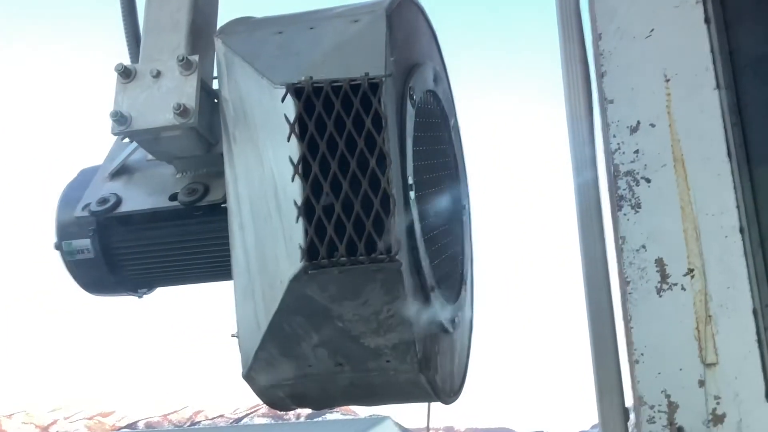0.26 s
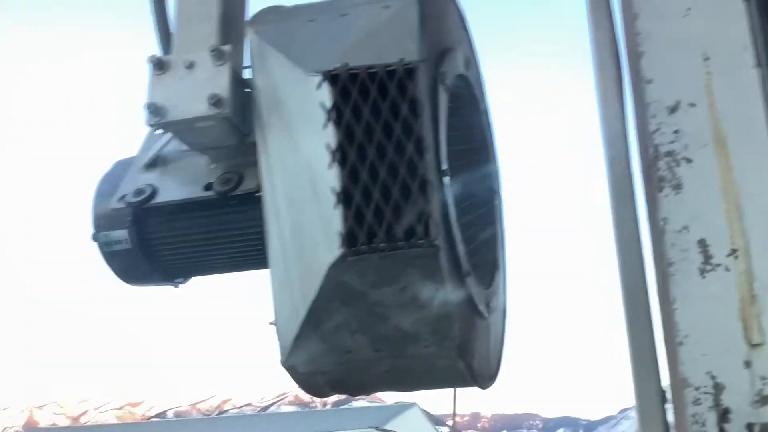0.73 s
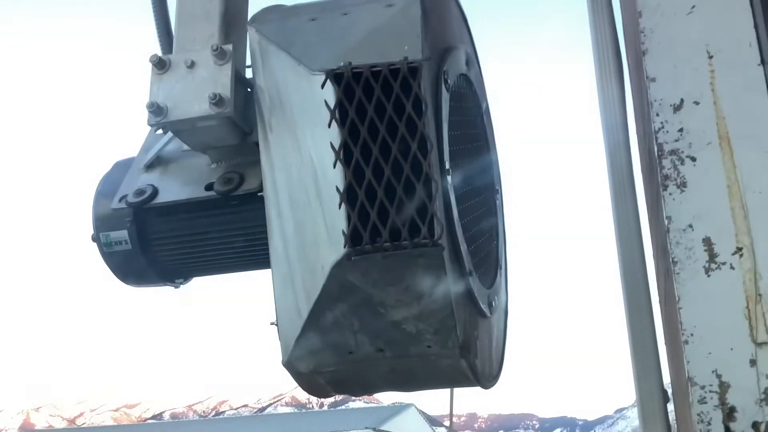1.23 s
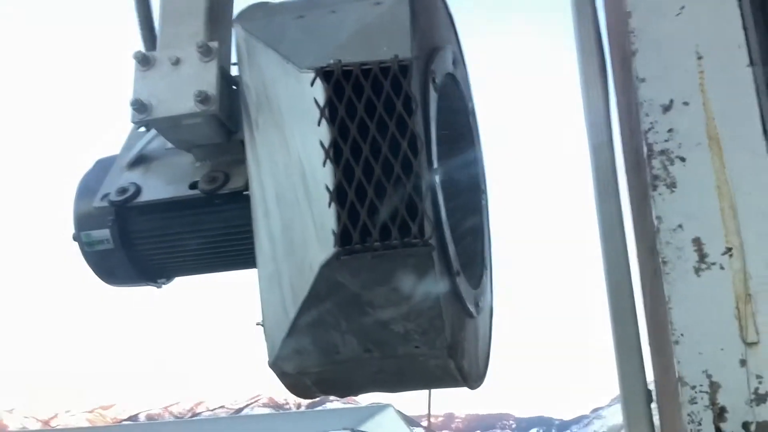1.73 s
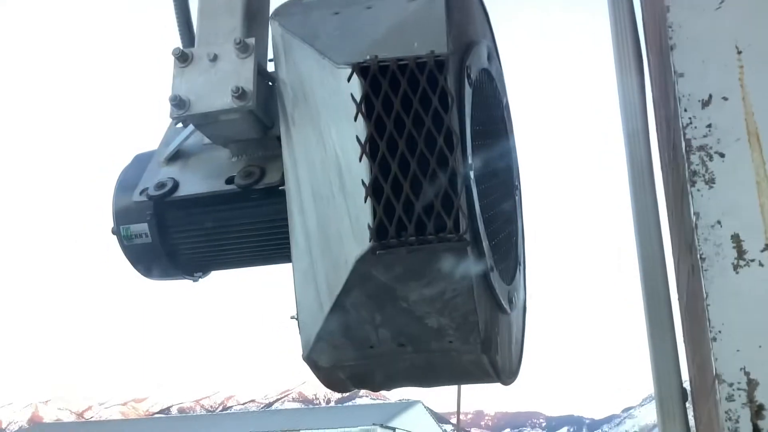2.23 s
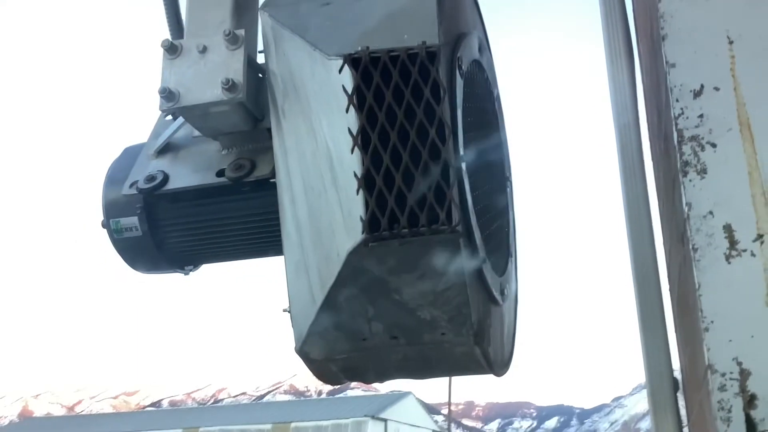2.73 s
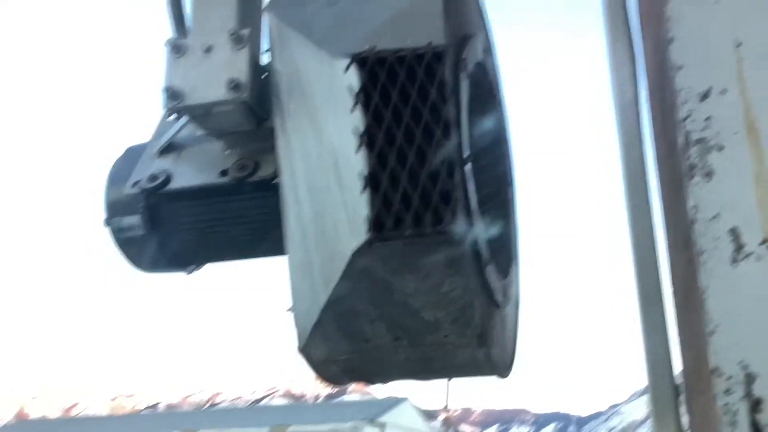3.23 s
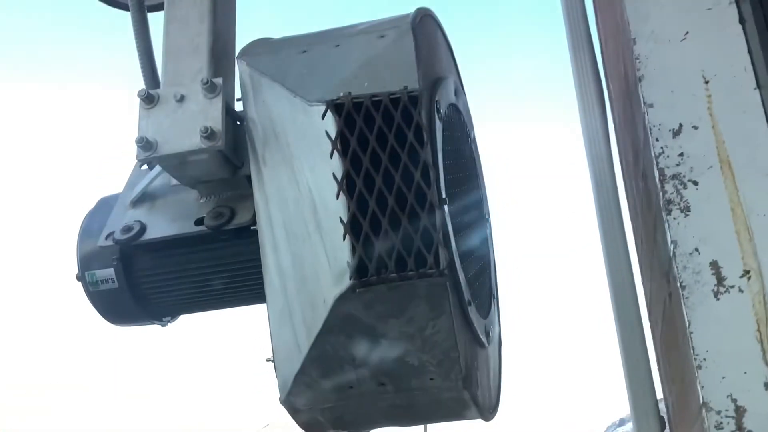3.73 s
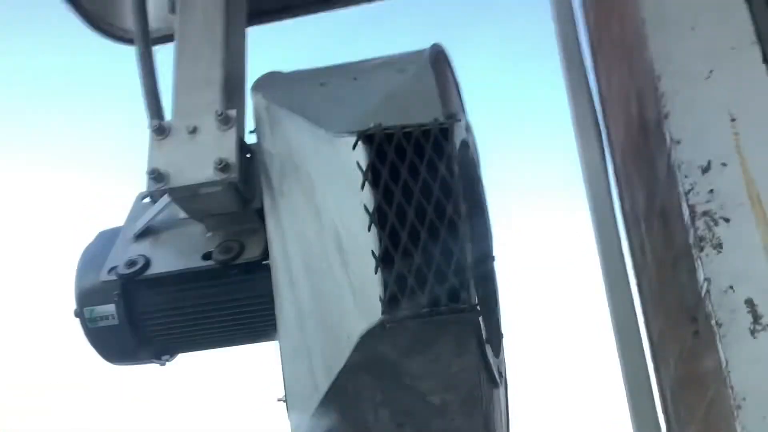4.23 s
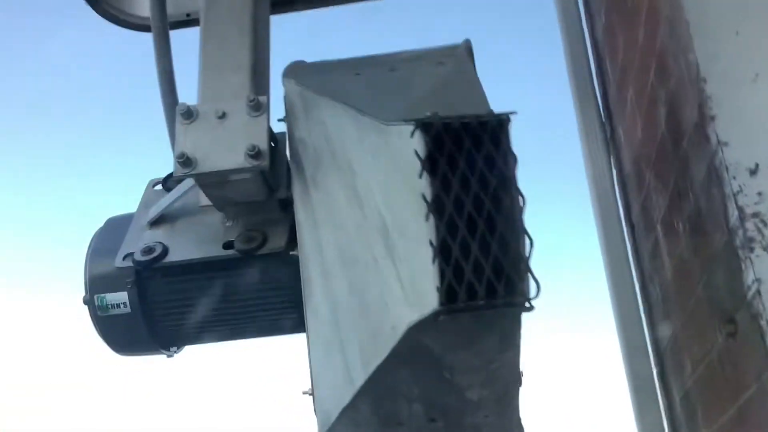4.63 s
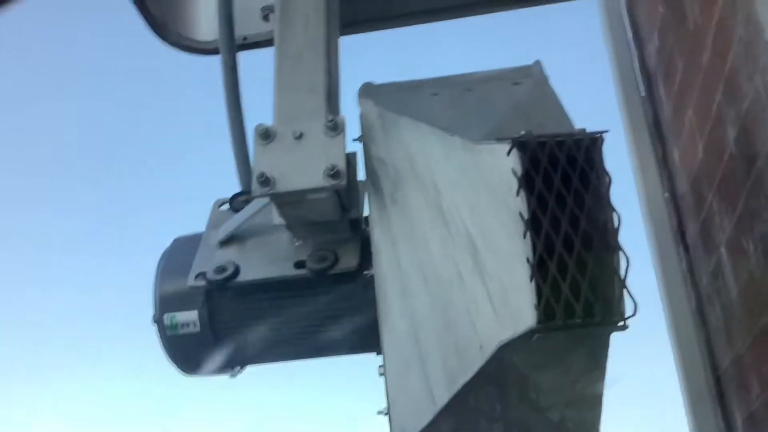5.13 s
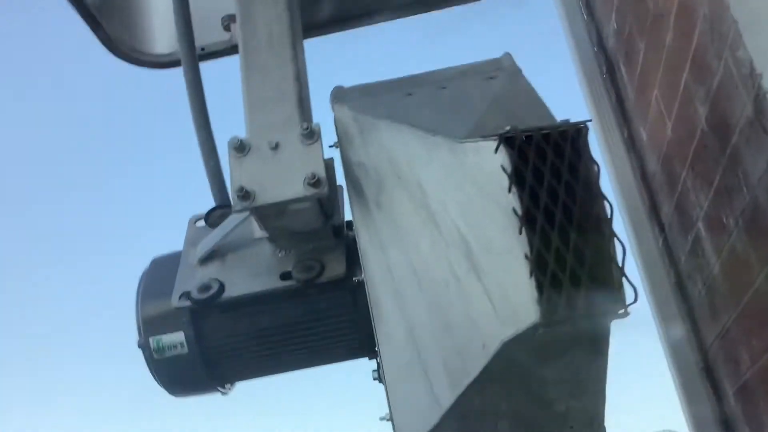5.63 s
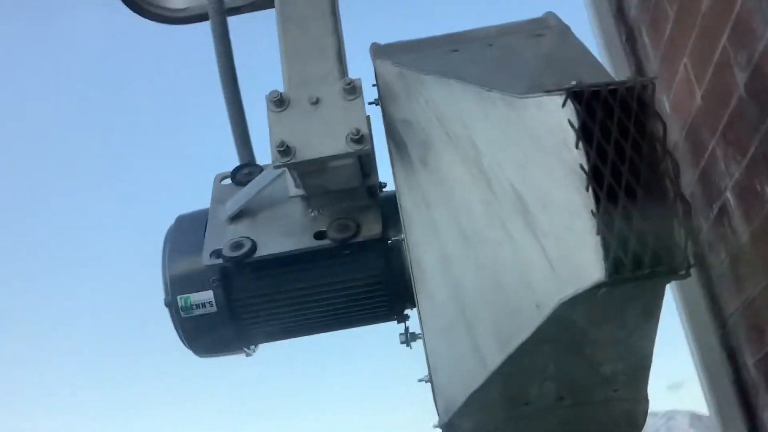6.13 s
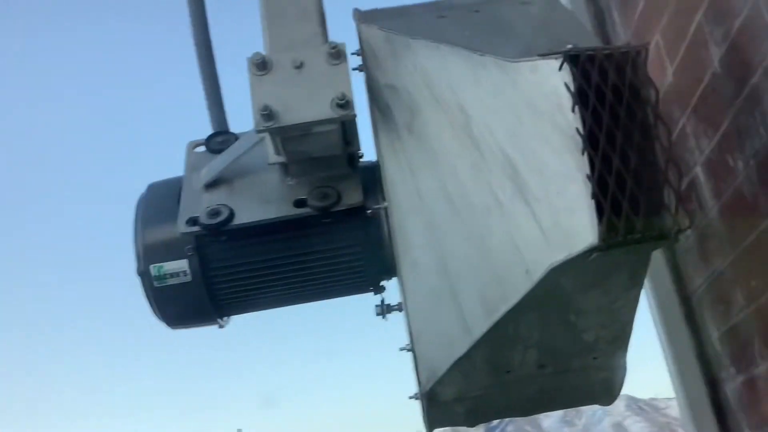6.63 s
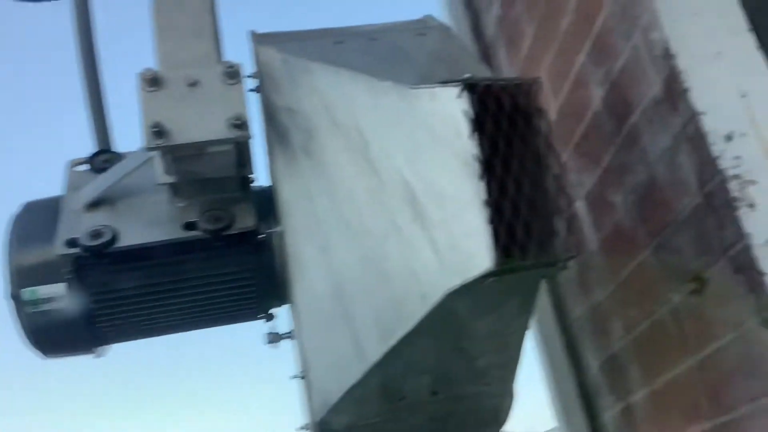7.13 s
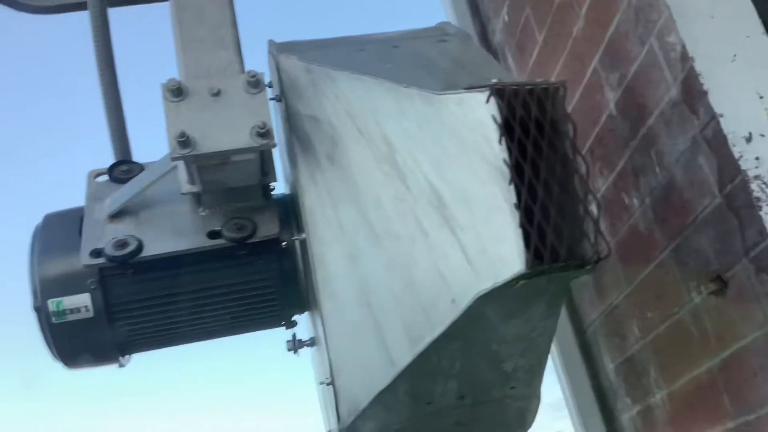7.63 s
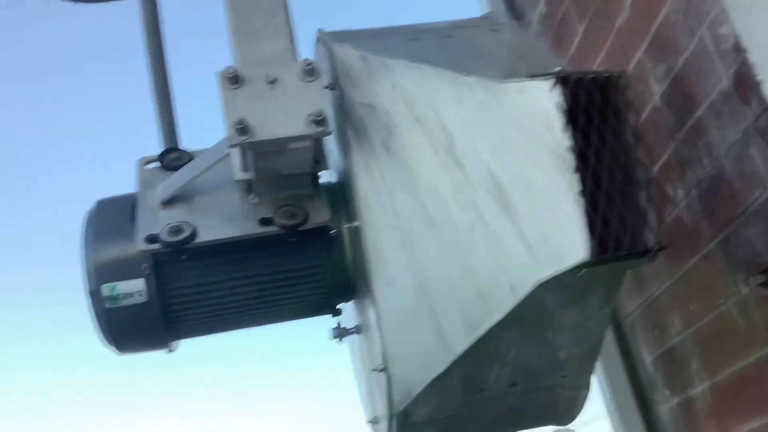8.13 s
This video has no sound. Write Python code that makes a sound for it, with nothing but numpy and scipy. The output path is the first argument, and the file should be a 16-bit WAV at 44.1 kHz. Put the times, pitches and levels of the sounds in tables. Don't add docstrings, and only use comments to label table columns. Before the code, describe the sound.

Heard through closed car glass, a heavy low air roar pulses repeatedly and grows stronger, over steady rumble, faint fan hum and thin seal hiss.

```python
import sys
import numpy as np
from scipy import signal
from scipy.fft import rfft, irfft, next_fast_len
from scipy.io import wavfile
from scipy.ndimage import uniform_filter1d, minimum_filter1d

SR = 44100
rng = np.random.default_rng(int(sys.argv[2]) if len(sys.argv) > 2 else 0)


def wav_out(sig):
    wavfile.write(sys.argv[1], SR, np.round(np.clip(np.atleast_2d(sig).T, -1, 1) * 32767).astype(np.int16))


def natural_amplitude(level_db):
    exponent = np.asarray(level_db, float) / 20
    return 10 ** exponent


N = 369116


# [f/Hz, level/dB per Hz]
BOOM_ASIDE = [(62, -44), (105, 1), (129, -8), (162, 1.5), (183, -8), (307, -19.5), (330, -8), (430, -50),
              (730, -120)]
BOOM_SQUARE = [(62, -30), (105, -6), (124, -3.5), (145, 2), (178, -4), (231, -3.5), (279, -14), (330, -14),
               (430, -44), (730, -120)]
BOOM_ASIDE_DB = (-17, -19.5, -22, -22.5)


def jet_boom():
    boom_db = by_turn(BOOM_ASIDE_DB) + jet_swell("boom")
    square = (boom_db + 20) / 7
    boom = airflow([BOOM_ASIDE, BOOM_SQUARE], square, 0.56, 0.64, size=4096, count=80)
    flutter_db = 0.69 * wander(6.3)
    return natural_amplitude(boom_db - 0.15 + flutter_db) * boom


# [f/Hz, level/dB per Hz]
PANELS_FACING = [(150, -16), (260, -0.5), (296, -7.5), (339, -2.5), (459, -7), (504, -6.5), (599, -15.5),
                 (639, -16.5), (950, -27.5), (1240, -60), (2090, -120)]
PANELS_TURNED = [(150, -11.5), (260, 2.5), (281, -6), (311, -9.5), (366, -0.5), (523, 0), (636, -7),
                 (852, -14), (950, -19.5), (1240, -41), (2090, -120)]
ROAR_ASIDE_DB = (-25, -27, -28.5, -27)
# [f/Hz, width/Hz, level/dB, follow/dB per dB of panel roar]
PANE = (3798, 500, -64, 3.5)


def panels():
    turned = blower_turn()
    roar_db = by_turn(ROAR_ASIDE_DB) + jet_swell("roar")
    roar = airflow([PANELS_FACING, PANELS_TURNED], turned, 0.54, 0.54, size=2048, count=110)
    hz, width, db, follow = PANE
    pane_db = db + follow * (roar_db - roar_db.mean()) - 40 * turned
    return natural_amplitude(roar_db + 1.42) * roar + natural_amplitude(pane_db) * ring(hz, width)


# [f/Hz, level/dB per Hz]
RUSH_FACING = [(460, -3), (780, -1), (823, -5), (1050, 4.5), (1230, -7.5), (1430, 1.5), (1590, -9),
               (1920, -6), (2450, -12), (2580, -10.5), (3730, -14), (4110, -15.5), (6600, -23.5),
               (8580, -39), (14500, -120)]
RUSH_TURNING = [(460, -21), (780, 2.5), (993, -7), (1210, -3), (1580, -17.5), (1640, -11), (1890, -9),
                (2140, -14), (2320, -11), (2510, -16), (2980, -16), (3260, -15), (6600, -26), (8580, -56),
                (14500, -120)]
RUSH_SIDEWAYS = [(460, -20), (780, -3.5), (933, -9), (1210, -7), (1440, -15.5), (1810, -20), (2010, -23),
                 (2930, -19), (3200, -23), (4040, -25), (5230, -30.5), (5720, -28), (6600, -49),
                 (8580, -68), (14500, -120)]
RUSH_TURNED = [(460, -19), (780, -4.5), (845, -1), (916, -8), (1390, -11.5), (2050, -26.5), (2240, -27.5),
               (2470, -22.5), (2650, -28), (2900, -24.5), (3230, -30.5), (3350, -29), (3690, -28),
               (4660, -31), (6600, -35), (8580, -65), (14500, -120)]


def air_rush():
    colours = [RUSH_FACING, RUSH_TURNING, RUSH_SIDEWAYS, RUSH_TURNED]
    air = airflow(colours, blower_turn(), 0.95, 1.33, size=1024, count=260)
    level_db = by_turn((-39.5, -40.5, -39.5, -36))
    level_db = level_db + 0.1 * jet_swell("roar") + jet_brush()
    return natural_amplitude(level_db + 2.2 + 0.49 * wander(27)) * air


# [start t/s, end t/s, f/Hz, width/Hz, level/dB]
MOANS = [
    (4.196, 5.2, 3010, 200, -53.5),
    (6.85, 8.9, 5330, 500, -60.5),
    (6.9, 8.7, 4740, 160, -59),
]


def trim_moans():
    t = np.arange(N) / SR
    moans = np.zeros(N)
    for start, end, hz, width, db in MOANS:
        progress = np.clip((t - start) / (end - start), 0, 1)
        envelope = np.sqrt(abs(np.sin(np.pi * progress)))
        moans += natural_amplitude(db) * envelope * ring(hz, width)
    return moans


# [f/Hz, level/dB per Hz]
HISS_FACING = [(3410, -17), (5800, -32), (6380, -18.5), (8470, -10), (9380, -9), (9700, -4), (10100, -4.5),
               (10700, -7), (11800, -10), (15500, -28)]
HISS_SIDEWAYS = [(3410, -16), (5800, -17), (6450, -12), (7610, -6), (8230, -10), (8890, -4), (9230, -4.5),
                 (10600, -4.5), (12600, -15), (13200, -19), (15500, -20)]
HISS_TURNED = [(3410, -28), (5800, -3), (6350, -13), (7040, -1), (9270, 0.5), (10300, 0.5), (10500, -5),
               (11100, -2), (11700, -7), (14100, -12), (15500, -19)]
HISS_DB = (-49.5, -52, -51.5, -52)


def seal_hiss(gusts):
    colours = [HISS_FACING, HISS_SIDEWAYS, HISS_TURNED]
    air = airflow(colours, blower_turn(), 0.93, 0.91, size=1024, count=400)
    level_db = by_turn(HISS_DB) + 0.67 * jet_brush()
    return natural_amplitude(level_db + 5.0 + 0.5 * gusts) * air


# [f/Hz, width/Hz, level/dB]
GAP = [(9860, 140, -4), (9990, 230, 0), (9430, 380, -8)]
# [t/s, level/dB, f/Hz]
WIDENING = [
    (0, -5, 9760),
    (3.7, 0, 10170),
    (4.3, -2, 10470),
    (4.6, 4, 10500),
    (5.2, 4.5, 10500),
]
# [f/Hz, width/Hz, level/dB]
LOWER_GAP = (8890, 110, -59.5)
# [t/s, length/s, swell level/dB]
GUSTS = [(0.349, 0.042, 14), (0.478, .05, 7.5), (0.607, .07, 7), (1.353, .05, 6), (1.68, 0.18, 9),
         (1.976, 0.055, 2), (2.643, 0.04, 9), (2.723, 0.046, 8), (3.74, .07, 7), (3.84, .06, 7),
         (4.35, .06, 1.5), (4.753, .05, 6)]


def seal_whistle(gusts):
    t = np.arange(N) / SR
    upper_db, upper_hz = curves(WIDENING)
    notes = list(GAP) + [(upper_hz, 420, upper_db)]
    whistle = sum(natural_amplitude(db) * ring(hz, width) for hz, width, db in notes)
    creep_db = 1.0 * t
    fading_db = -22 * np.clip((t - 4.4) / 1.1, 0, 1)
    level_db = -55.5 + creep_db + fading_db + bumps(*np.transpose(GUSTS)) + 2.5 * gusts
    hz, width, db = LOWER_GAP
    lower = natural_amplitude(db - 60 * blower_turn()) * ring(hz, width)
    return natural_amplitude(level_db) * whistle + lower


BLADE_HZ = 586.8
# [multiple, level/dB]
BLADE_ORDERS = [(1, 0), (2, -15), (3, -22), (4, -29), (5, -28)]


def blades():
    facing_db = jet_swell("blades", lead_s=0.51)
    turns = np.cumsum(BLADE_HZ + 1.8 * wander(5)) / SR
    hum = np.zeros(N)
    for k, db in BLADE_ORDERS:
        level_db = db + 3.2 * wander(5) + (facing_db - 6) / k
        hum += natural_amplitude(level_db) * np.cos(2 * np.pi * k * turns)
    return natural_amplitude(-39.5) * np.sqrt(2) * hum


# [f/Hz, level/dB per Hz]
CABIN = [(24, -47), (40, -11), (73, 0), (115, 0.5), (150, -22.5), (250, -120)]


def cabin_rumble():
    return natural_amplitude(-19.95) * airflow([CABIN, CABIN], blower_turn(), 0.23, 0.34, size=4096, count=40)


# [t/s, boom swell level/dB, roar swell level/dB, blade swell level/dB]
SWEEPS = [
    (0.68, 3, 4, 3),
    (2.15, 3.5, 4.5, 11.5),
    (3.6, 3.5, 5.5, 10),
    (5.0, 6.5, 4, 4.5),
    (6.45, 9.5, 7, 8),
    (7.88, 10.5, 6, 15),
]


def jet_swell(part, lead_s=0):
    times, boom, roar, blade = np.transpose(SWEEPS)
    swell_db = {"boom": boom, "roar": roar, "blades": blade}[part]
    return bumps(times - lead_s, 1.485, swell_db)


# [t/s, length/s, swell level/dB]
BRUSH = (4.2, 1.0, 1)


def jet_brush():
    return bumps(*np.transpose([BRUSH]))


# [t/s, turn 0-1]
TURN = [
    (0, 0.04),
    (3.9, 0.06),
    (4.5, 0.22),
    (5, 0.2),
    (5.5, 0.35),
    (6.3, 0.66),
    (6.7, 0.61),
    (7.1, 0.91),
    (8.37, 1),
]


def blower_turn():
    return curves(TURN)[0]


def by_turn(levels):
    return np.interp(blower_turn(), np.linspace(0, 1, len(levels)), levels)


def airflow(colours, share, patchy_db, ridged_db, size, count):
    hop = size // 4
    frames = N // hop + 5
    hz = np.fft.rfftfreq(size, 1 / SR)[:count]
    a, b, patches, ridges = rng.standard_normal((frames, len(hz), 4)).T
    patches = uniform_filter1d(patches, size=9, axis=0)
    patches = evened(uniform_filter1d(patches, size=15, axis=1))
    for _ in range(2):
        ridges = uniform_filter1d(ridges, size=2, axis=0)
        ridges = uniform_filter1d(ridges, size=SR // hop, axis=1)
    shapes_db = []
    for rows in colours:
        f, db = np.transpose(rows)
        shapes_db.append(np.interp(np.log(hz + 1), np.log(f + 1), db, left=-120))
    frame_share = share[np.minimum(np.arange(frames) * hop, N - 1)]
    place = np.clip(frame_share, 0, 1) * (len(colours) - 1)
    weights = np.maximum(1 - abs(place - np.arange(len(colours))[:, None]), 0)
    colour = natural_amplitude(np.array(shapes_db).T @ weights)
    colour = colour / np.sqrt((colour ** 2).mean(0))
    colour = colour * natural_amplitude(patchy_db * patches + ridged_db * evened(ridges))
    spectra = np.pad((a + 1j * b) * colour, ((0, 2 * hop + 1 - count), (0, 0)))
    return evened(signal.istft(spectra, nperseg=size, noverlap=size - hop)[1][:N])


def ring(hz, width):
    r = np.exp(-np.pi * width / SR)
    slow = signal.lfilter([1], [1, -2 * r, r * r], rng.standard_normal((2, N)))
    angle = 2 * np.pi * np.cumsum(hz * np.ones(N)) / SR
    return evened(slow[0] * np.cos(angle) + slow[1] * np.sin(angle))


def bumps(times, lengths, heights):
    t = np.arange(0, N, 64) / SR
    phase = np.pi * np.clip((t[:, None] - times) / lengths, -0.5, 0.5)
    swells = np.cos(phase) ** 1.52 @ heights
    return np.interp(np.arange(N) / SR, t, swells)


def wander(hz):
    size = next_fast_len(N)
    z = rfft(rng.standard_normal(size))
    f = np.fft.rfftfreq(size, 1 / SR)
    return evened(irfft(z * (f > 0) / (1 + (f / hz) ** 2), size)[:N])


def curves(rows):
    s, *columns = np.transpose(rows)
    return [np.interp(np.arange(N) / SR, s, c) for c in columns]


def evened(x):
    return x / np.sqrt(np.mean(x ** 2) + 1e-20)


def scene():
    gusts = wander(49)
    jet = jet_boom() + panels() + air_rush() + trim_moans()
    seal = seal_hiss(gusts) + seal_whistle(gusts)
    return (jet + seal + blades() + cabin_rumble())[None]


def top_cut(x):
    return signal.sosfilt(signal.butter(12, 15640, fs=SR, output="sos"), x)


def record(dry):
    cut = signal.sosfilt(signal.butter(4, 36, "highpass", fs=SR, output="sos"), dry)
    power_db = 10 * np.log10(abs(uniform_filter1d(cut[0] ** 2, size=900)) + 1e-12)
    over_db = np.maximum(power_db + 13.5, 0)
    held = cut / natural_amplitude(0.24 * uniform_filter1d(over_db, size=900))
    room_left = np.minimum(0.9 / (abs(held[0]) + 1e-9), 1)
    room_left = minimum_filter1d(room_left, size=801)
    limiter_gain = uniform_filter1d(uniform_filter1d(room_left, size=401), size=401)
    return top_cut(held * limiter_gain)


dry = scene()
out = record(dry)
wav_out(out)
```